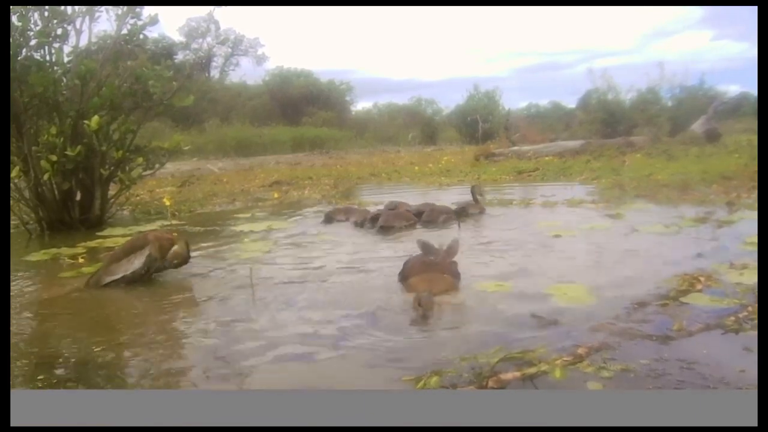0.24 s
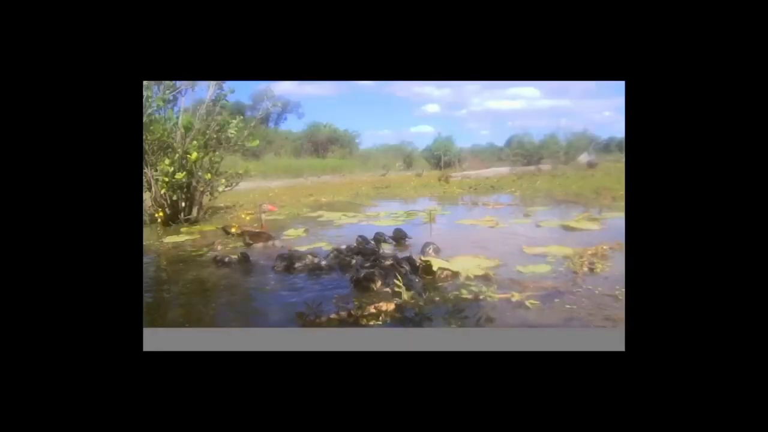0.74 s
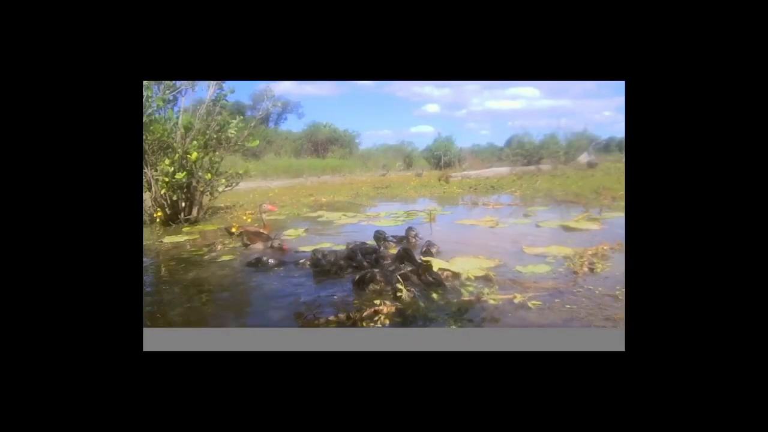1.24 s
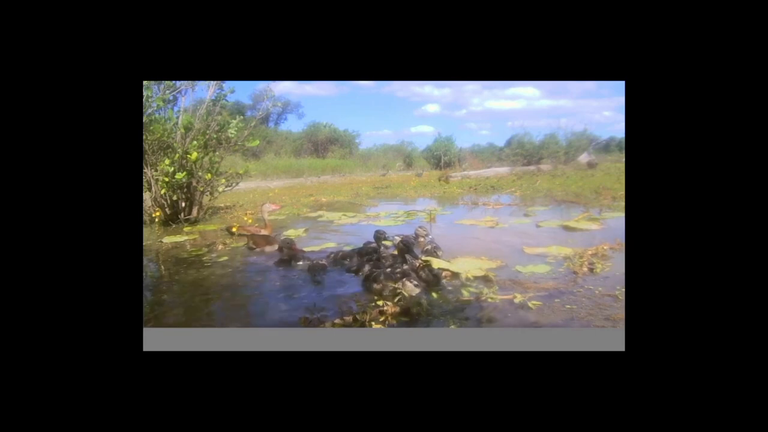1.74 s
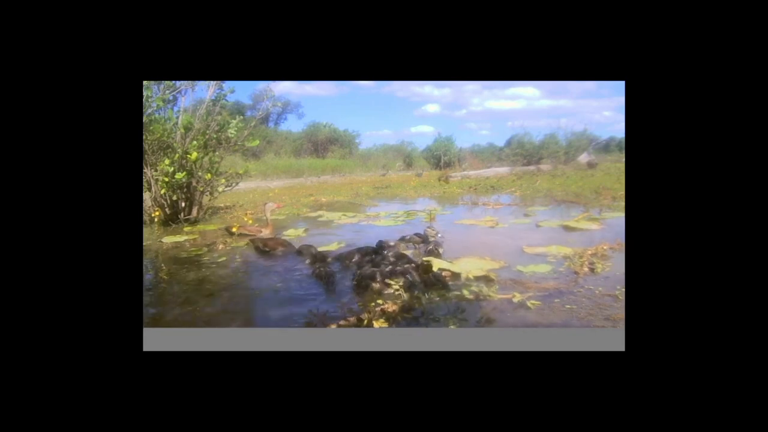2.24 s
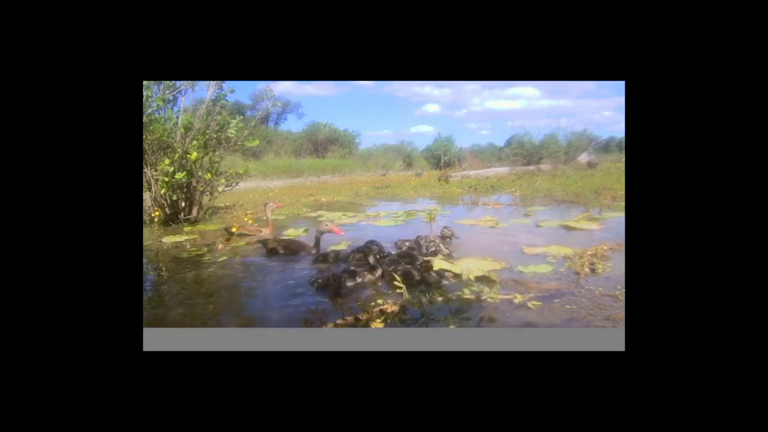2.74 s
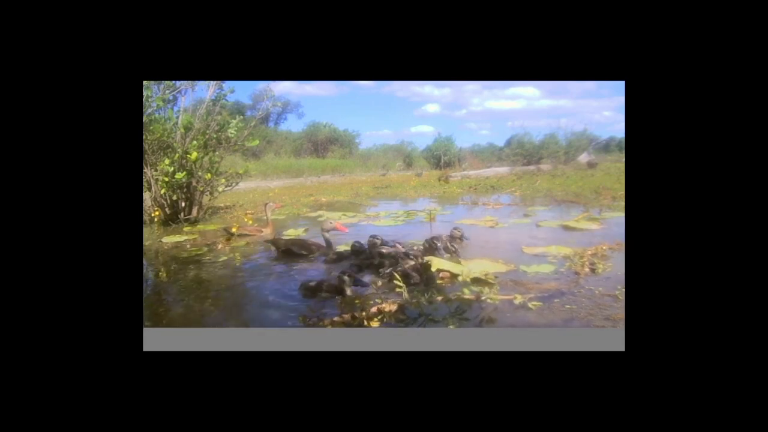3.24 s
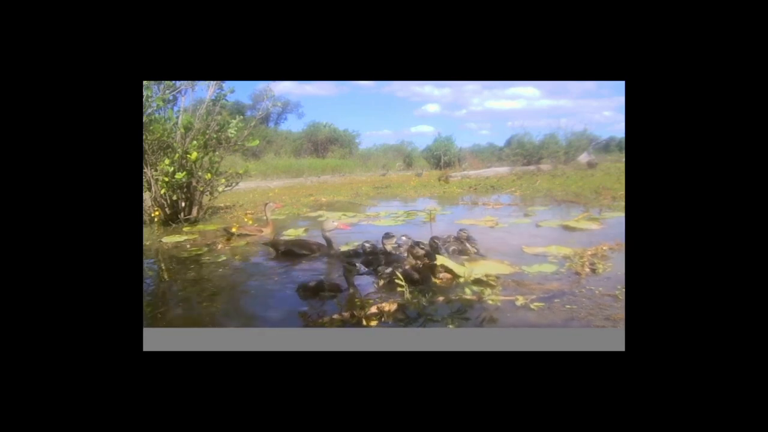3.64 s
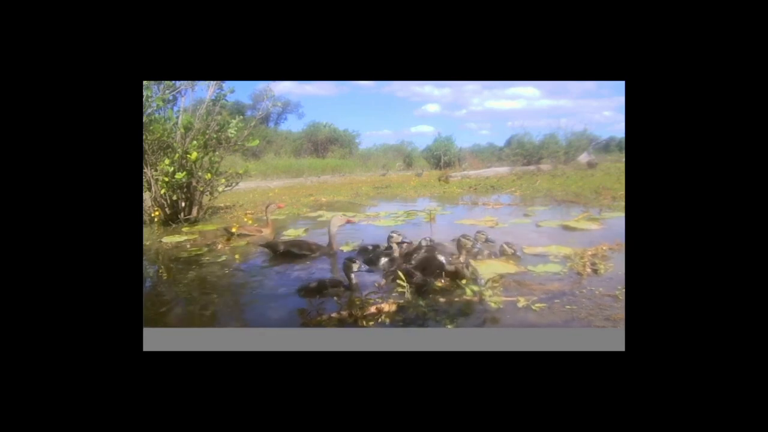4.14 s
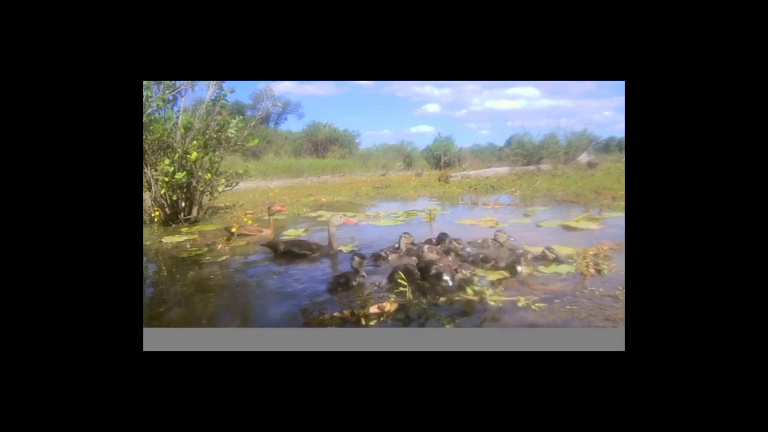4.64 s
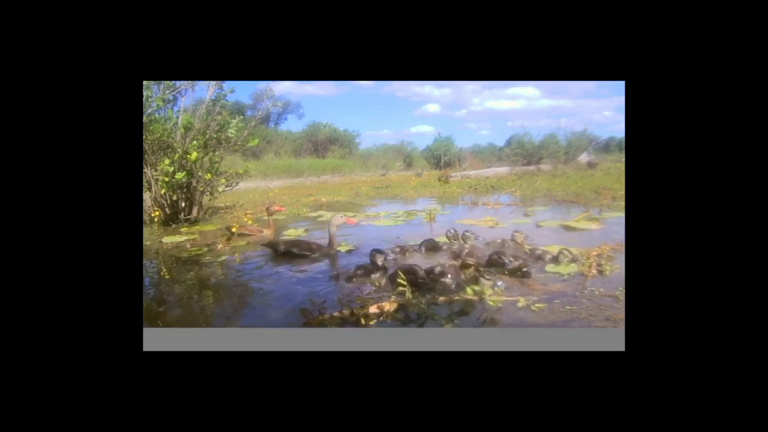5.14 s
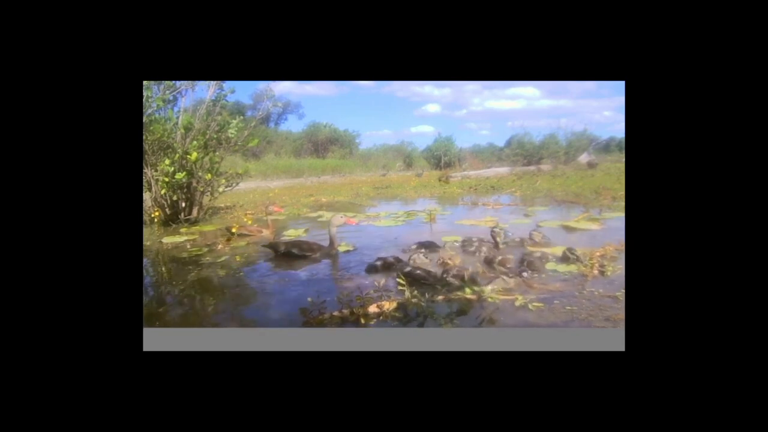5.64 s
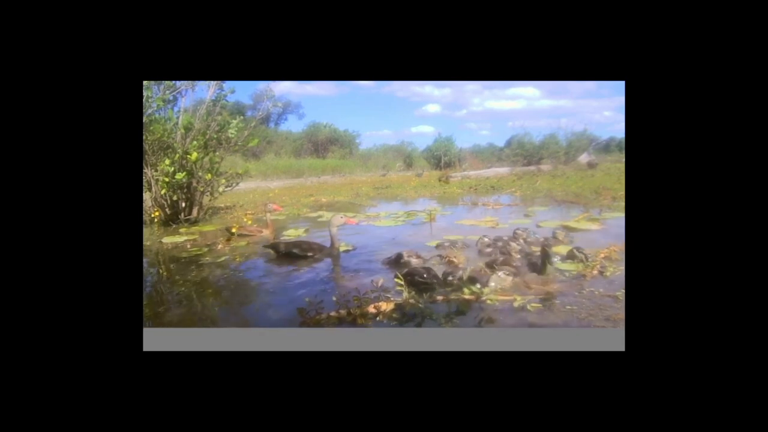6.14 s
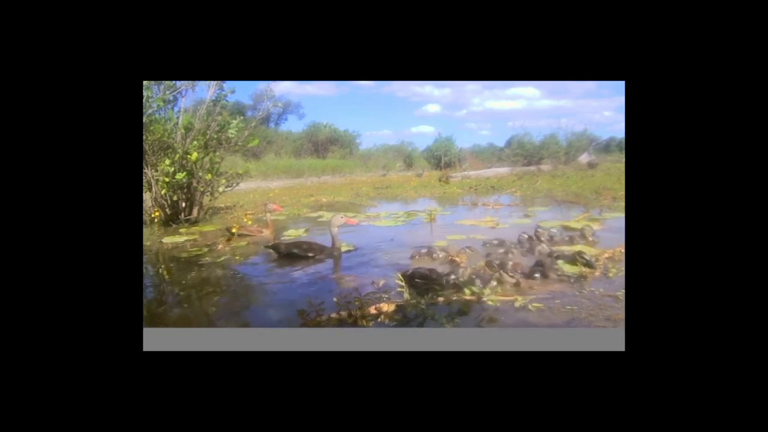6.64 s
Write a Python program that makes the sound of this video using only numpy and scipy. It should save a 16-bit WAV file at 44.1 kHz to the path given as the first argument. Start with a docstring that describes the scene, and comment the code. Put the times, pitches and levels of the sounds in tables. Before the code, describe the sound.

A brief wet pop and wind bump, then about half a second of dead silence. Sound snaps back with a duck flock feeding close by: crisp bill pops, droplets, tiny high peeps and nasal chatter. Piercing chirp-then-falling whistles recur about every second and a half. Low wind buffets strike the small, narrow-band outdoor microphone over faint leaf and water hiss.

```python
"""Whistling ducks in a shallow lagoon

Adults give two-voiced whistles from paired oscillators; others chatter in arched harmonic notes.
Ducklings peep in nearly pure pitch bends; bills dabble in cracks and ringing bubbles.
Filtered noise makes the wind rumble and the hiss of leaves and water.
A small field camera narrows the band and adds mirrored tones; faint treble lies above the band edge,
and the sound drops out once.
"""
import sys
import numpy as np
from scipy import signal
from scipy.io import wavfile
from scipy.ndimage import uniform_filter1d

SR = 44100
rng = np.random.default_rng(int(sys.argv[2]) if len(sys.argv) > 2 else 0)


def int16_out(signal):
    """Quantize to a 16-bit WAV file."""
    q = np.round(np.clip(np.atleast_2d(signal).T, -1, 1) * 32767)
    wavfile.write(sys.argv[1], SR, q.astype(np.int16))


N = 303849  # samples


def undb(db):
    """Amplitude for a level in dB."""
    return 10 ** (np.asarray(db) / 20)


def band(x, lo_hz, hi_hz, order=2):
    """Band-pass scaled to rms 1."""
    y = signal.sosfilt(signal.butter(order, [lo_hz, hi_hz], "band", fs=SR, output="sos"), x)
    return y / np.sqrt(np.mean(y ** 2))


def walk(rate, size):
    """Random levels, a new target every 1 / rate s, joined by slopes; spread near 1."""
    k = int(SR / rate)
    targets = np.repeat(rng.standard_normal(size // k + 1), k)
    return 1.2 * uniform_filter1d(targets, k)[:size]


def add(out, s, x):
    """Mix x into out from s seconds on."""
    i = int(s * SR)
    out[i:i + len(x)] += x[:len(out[i:])]


def swells(rows, column, base_db, order):
    """Gain that rests at a base level and rises in smooth humps at (middle s, half length s, ..) rows."""
    t = np.arange(N) / SR
    humps = sum(undb(r[column]) ** 2 * np.exp(-np.abs((t - r[0]) / r[1]) ** order) for r in rows)
    return np.sqrt(undb(base_db) ** 2 + humps)


# Calls of two adults, the fainter one farther off. Each row: top of the chirp in seconds, low voice there
# in Hz, chirp level in dB, start of the held note in seconds, its length in seconds, its highest low voice
# and highest high voice in Hz, its level in dB, lift of the octave in dB.
WHISTLE_CALLS = [(1.579, 3273, -21, 1.634, .207, 2700, 3445, -28.5, -1),
                 (2.946, 3280, -25, 3.007, .201, 2710, 3405, -32, 0),
                 (4.509, 3340, -22.5, 4.572, .199, 2724, 3463, -29.5, -1),
                 (5.896, 3260, -21, 5.954, .164, 2657, 3355, -31, 1),
                 (1.69, 2800, -56, 1.75, .26, 2290, 2950, -62, 12),
                 (5.712, 2830, -58, 5.775, .36, 2230, 2910, -61, 8),
                 (6.643, 2820, -57, 6.705, .3, 2330, 3040, -61, 9)]
# Partials made of both voices. Each row: times the low voice, times the high voice, dB over the high voice.
MIXED_PARTIALS = [(1, 1, -5), (-1, 2, -18), (0, 2, -15), (3, -1, -15), (2, -1, -34), (2, 1, -22),
                  (4, -1, -20), (-1, 3, -24)]
THIRD_DB = -8  # third partial of the low voice against its octave
BREATH_DB, RASP_DB = -24, 9  # rush of air that roughens the partials; extra while the chirp climbs
PARTIAL_WAVER_DB, CHIRP_FLUTTER_DB = 3, 3.5  # break-up of the overtones; quicker extra around the chirp


def whistles():
    """Two oscillators in one windpipe: each voice, the overtones of the low one, and their sums and differences."""
    out = np.zeros(N)
    for call in WHISTLE_CALLS:
        top_s = call[0]
        s, *columns = phrase(*call)
        t = np.arange(s[0], s[-1], 1 / SR)
        low_hz, low_db, octave_db, high_hz, high_db = (
            uniform_filter1d(np.interp(t, s, c), int(0.0042 * SR), mode="nearest") for c in columns)
        low = 2 * np.pi * np.cumsum(low_hz * (1 + 0.0035 * walk(150, size=len(t)))) / SR
        high = 2 * np.pi * np.cumsum(high_hz * (1 + 0.0029 * walk(150, size=len(t)))) / SR

        def waver():  # a fresh draw each time, so the partials swell apart
            slow = PARTIAL_WAVER_DB * walk(91, size=len(t))
            return slow + (t < top_s + .025) * CHIRP_FLUTTER_DB * walk(350, size=len(t))

        high_db = high_db + waver() / 2
        low_db = low_db + waver() / 3
        x = undb(low_db) * np.sin(low) + undb(high_db) * np.sin(high)
        octave_gain = undb(octave_db + waver())
        third = undb(THIRD_DB + waver()) * np.sin(3 * low)
        x += octave_gain * (np.cos(2 * low) - third)
        for m, n, db in MIXED_PARTIALS:
            x += undb(high_db + db + waver()) * np.sin(m * low + n * high + rng.uniform(0, 2 * np.pi))
        x *= 1 + undb(BREATH_DB + RASP_DB * (t < top_s)) * walk(1500, size=len(t))
        add(out, s[0], np.sqrt(2) * signal.windows.tukey(len(t), .06) * x)
    return out


# Shape of the quick chirp. Each row: seconds from its top, low voice in Hz before tuning, its level in dB,
# its octave in dB, high voice in Hz before tuning, its level in dB; levels against the chirp's own.
CHIRP_SHAPE = [(-.036, 2268, -29, -35, 3180, -66), (-.026, 2696, -21, -19.5, 3450, -35),
               (-.022, 2790, -18.5, -15.5, 3630, -8.5), (-.012, 3115, -13, -8.5, 4220, -5),
               (0, 3281, 1.5, -8, 4780, -7), (.012, 2845, -4.5, -11.5, 4700, -18),
               (.024, 2485, -14, -14, 4700, -45), (.036, 2274, -15, -11, 3165, -44)]
# Shape of the held note. Each row: share of its length, then columns as the chirp, against the note's level.
HELD_SHAPE = [(0, 2645, -14, -12, 3340, -3), (.25, 2700, -12, -11, 3420, 0),
              (.4, 2660, -14.5, -11, 3350, -4), (.55, 2555, -17.5, -16, 3125, -10),
              (.7, 2415, -18, -17, 2880, -12), (.86, 2170, -22, -25, 2720, -22),
              (1, 1880, -34, -40, 2600, -45)]
# The step just before the held note, one row: seconds from the note's start, then columns as the chirp.
JOIN_STEP = (-.011, 2540, -10, -11, 3290, -24)


def phrase(top_s, top_hz, chirp_db, held_s, length, low_hz, high_hz, held_db, octave_db):
    """A quick chirp and a held note, both sides of the syrinx sounding; placed, tuned and scaled for one whistle."""
    chirp, held = np.array(CHIRP_SHAPE), np.array(HELD_SHAPE)
    tune = top_hz / chirp[:, 1].max()
    chirp = chirp * [1, tune, 1, 1, tune, 1] + [top_s, 0, chirp_db, chirp_db + octave_db, 0, chirp_db]
    low_tune = low_hz / held[:, 1].max()
    high_tune = high_hz / held[:, 4].max()
    held = held * [length, low_tune, 1, 1, high_tune, 1]
    join = np.multiply(JOIN_STEP, [1, low_tune, 1, 1, high_tune, 1])
    held = np.vstack([join, held]) + [held_s, 0, held_db, held_db + octave_db, 0, held_db]
    return np.vstack([chirp, held]).T


# Soft arched notes. Each row: start in seconds, length in seconds, middle pitch in Hz, drop from there
# to the end as a share (0-1), level in dB, number of the loudest partial, change of the third partial in dB.
CHATTER_NOTES = [(0.704, 0.059, 1040, 0.09, -50.5, 4.6, 1), (0.757, 0.054, 1207, 0.1, -38.5, 2.47, 2.5),
                 (0.953, 0.062, 1084, 0.2, -52, 2.8, -9), (1.039, 0.054, 1187, 0.15, -35.5, 2.78, -1.5),
                 (1.195, 0.058, 1083, 0.27, -57.5, 2.6, 1.5), (1.343, 0.048, 1145, 0.16, -34, 3.37, 0),
                 (1.412, 0.07, 1165, .08, -56, 3, 0), (1.616, 0.049, 1156, 0.29, -36, 2.9, 0),
                 (1.956, 0.051, 1124, 0.25, -64.5, 2.7, 9.5), (2.083, 0.074, 1144, 0.26, -54.5, 3.1, -5),
                 (2.228, 0.075, 1155, 0.31, -55.5, 3.3, 2.5), (2.3, 0.063, 1130, 0.2, -56.5, 2.9, -7),
                 (2.504, 0.05, 1136, 0.23, -53, 2.4, -6), (2.536, 0.042, 1096, 0.3, -56, 2.9, 0),
                 (2.561, .04, 1190, 0.02, -59, 2.9, -6), (2.715, 0.064, 1110, 0.26, -59, 2.9, -12),
                 (2.764, 0.061, 1188, 0.08, -55.5, 2.8, -5), (2.817, 0.056, 1160, 0.3, -56.5, 2.8, 5),
                 (3.389, 0.077, 1126, .07, -57, 2.7, -5), (3.457, 0.042, 1170, 0.22, -52, 4.1, -2),
                 (3.619, 0.077, 1064, 0.33, -56.5, 3.6, -5), (3.788, 0.023, 1150, .08, -64, 4, 8),
                 (3.845, 0.048, 1115, 0.07, -58, 2.8, -7), (4.07, 0.06, 1100, 0.08, -58.5, 1.5, -13),
                 (4.265, 0.08, 1114, 0.1, -53.5, 3.2, -11), (3.576, 0.048, 1160, 0.1, -63, 4, -3),
                 (4.992, 0.036, 1140, 0, -65, 3.5, -8), (5.215, .03, 1110, 0.2, -62, 4, -2),
                 (6.25, 0.078, 1080, 0.34, -57, 3.4, 3), (6.456, 0.041, 1083, 0.25, -62.5, 4.2, 10)]
RISE_SHARE = 0.669  # a note climbs this share of what it falls
NASAL_DB = 4.5  # loss for each partial away from the loudest
MUFFLE_DB = -5  # times the square root of the steps outside partials 2 to 4
DULL_PER_DB, NEAR_DB = .25, -36  # upper partials fade this much for each dB a note lies below NEAR_DB
FAR_NOTES, FAR_DB = 20, -69  # murmur of birds across the water; its lowest note level


def chatter():
    """Nasal notes: seven partials that fall away from the loudest one; far birds add fainter ones at random."""
    out = np.zeros(N)
    far = [(u * N / SR, .04 + .03 * a, 1070 + 110 * b, .05 + .15 * c, FAR_DB + 5 * d, 2 + 2 * e, 16 * f - 11)
           for u, a, b, c, d, e, f in rng.random((FAR_NOTES, 7))]
    k = np.arange(1, 8)[:, None]  # partial numbers
    for s, length, hz, fall, db, loudest, third_db in CHATTER_NOTES + far:
        phase, swell = arch(length, hz * (1 - RISE_SHARE * fall), hz, hz * (1 - fall), edge=0.66)
        colour_db = third_db * (k == 3) + (k > 4) * DULL_PER_DB * (db - NEAR_DB)
        colour_db = colour_db + MUFFLE_DB * np.abs(k - np.clip(k, 2, 4)) ** .5
        gain = undb(db + colour_db - NASAL_DB * np.abs(k - loudest))
        add(out, s, swell * np.sum(gain * np.cos(k * phase), axis=0))
    return out


# Short pure notes: duckling peeps, and at 5.714 s the chirp of the far adult's whistle.
# Each row: start in seconds, length in seconds, start, middle and end pitch in Hz,
# level in dB, octave in dB over it.
SHORT_NOTES = [(0.643, 0.031, 5990, 4400, 4400, -50, -34), (0.774, 0.049, 3730, 3333, 2600, -41, -14.5),
               (0.791, 0.032, 4760, 3830, 3700, -42, -37), (0.889, 0.033, 3430, 3620, 2710, -37, -21),
               (0.901, 0.024, 5420, 4400, 4290, -50, -35), (1.008, 0.039, 3220, 3495, 2570, -37, -28),
               (1.028, 0.02, 5330, 4700, 4340, -51, -35), (1.078, 0.028, 4480, 3880, 3620, -41.5, -30),
               (1.154, 0.036, 5700, 4700, 3970, -48.5, -40), (1.293, 0.037, 5850, 4580, 4200, -47, -35),
               (1.443, 0.021, 4810, 4480, 4100, -41, -37), (3.686, 0.035, 2950, 3100, 2610, -46.5, -13),
               (3.712, 0.024, 3180, 3390, 2590, -46, -10), (3.782, 0.029, 3820, 3470, 2590, -50, -12),
               (3.83, 0.036, 2870, 3250, 2930, -51, -7), (3.85, 0.049, 3820, 3710, 2440, -49.5, -14),
               (3.938, 0.035, 3320, 4230, 2270, -48.5, -12.5), (4.035, 0.037, 4490, 3750, 2520, -50, -17),
               (4.121, 0.029, 2700, 2760, 2630, -63, 4), (4.142, 0.037, 3860, 3700, 2760, -48, -13.5),
               (4.212, 0.04, 2450, 2855, 2640, -63, 12.5), (4.206, 0.024, 3500, 4320, 5320, -51.5, -22),
               (4.242, 0.052, 3560, 4115, 2760, -35.5, -27), (4.35, 0.056, 3040, 4380, 3050, -36.5, -39),
               (4.426, 0.03, 4900, 3750, 3050, -47, -16), (4.562, 0.025, 5340, 4220, 3100, -34, -30),
               (4.913, 0.024, 3940, 3450, 3190, -52, -37), (5.055, 0.019, 3370, 3570, 2870, -51.5, -16),
               (5.436, 0.029, 4420, 4080, 3790, -56.5, -32), (5.544, 0.021, 4240, 4140, 3560, -52, -35),
               (5.66, 0.055, 4550, 4260, 3620, -57, -37), (5.674, 0.031, 2990, 3100, 2540, -50, -28),
               (5.714, 0.028, 2800, 2900, 2520, -48.5, -30)]


def peeps():
    """Nearly pure bends with an unsteady octave, mostly weak, that lives in the middle of the note."""
    out = np.zeros(N)
    for s, length, *hz, db, octave_db in SHORT_NOTES:
        phase, swell = arch(length, *hz, edge=.4)
        octave_gain = undb(octave_db + 4 * walk(250, size=len(phase))) * swell ** 2 / 2
        tone = np.sin(phase) + octave_gain * np.sin(2 * phase)
        add(out, s, undb(db + 2 * walk(300, size=len(phase))) * swell * tone)
    return out


def arch(length, start_hz, middle_hz, end_hz, edge):
    """Phase of a parabolic pitch bend through three points, and its swelling, flickering envelope."""
    u = np.linspace(0, 1, int(length * SR))
    hz = np.polyval(np.polyfit([0, .5, 1], [start_hz, middle_hz, end_hz], 2), u)
    swell = np.sqrt(2) * np.sin(np.pi * u) ** edge * undb(1.2 * walk(120, size=len(u)))
    return 2 * np.pi * np.cumsum(hz) / SR, swell


# Bills breaking the surface, the loudest. Each row: time in seconds, peak in dB, ring in Hz.
BILL_POPS = [(0.043, -31, 3550), (0.659, -24, 2770), (0.7064, -29, 1690), (0.7312, -27.5, 3550),
             (0.735, -24.5, 4630), (.872, -30.5, 990), (.9783, -33.5, 1670), (1.2396, -32, 1700),
             (1.2636, -25, 5840), (1.272, -35, 3650), (1.409, -29.5, 1410), (1.4451, -17.5, 4770),
             (1.4587, -27.5, 2510), (1.5066, -29, 3660), (1.5359, -29, 1550), (1.8708, -28.5, 5700),
             (1.892, -27, 2700), (2.1263, -29, 2740), (2.3275, -35.5, 2910), (2.4494, -39, 3400),
             (2.4847, -29.5, 1680), (3.2533, -32.5, 1486), (3.374, -34, 2780), (3.754, -35.5, 1190),
             (3.7673, -32, 1860), (4.0032, -25.5, 2880), (4.0129, -31, 1950), (4.1979, -24.5, 2660),
             (4.3394, -32, 2360), (4.3562, -20, 2480), (4.3583, -26, 3690), (4.4155, -27.5, 2800),
             (4.42, -27, 2140), (4.482, -19.5, 3440), (4.8228, -31, 2820), (4.8606, -22, 5500),
             (4.905, -27, 1880), (4.9103, -21, 2260), (5.1039, -30.5, 1480), (5.2441, -28.5, 3730),
             (5.331, -23, 2600), (5.3541, -27.5, 2320), (5.4565, -33, 2380), (5.522, -31.5, 2300),
             (5.6429, -32.5, 6500), (5.7654, -23, 2860), (5.78, -31, 4450), (5.8572, -23, 2740),
             (6.1333, -30.5, 2200), (6.17, -29, 3750), (6.22, -23, 2560), (6.262, -23, 4000),
             (6.3114, -27.5, 3000), (6.4354, -26.5, 2760), (6.5068, -31.5, 1300), (6.594, -36.5, 6000),
             (6.6477, -33.5, 5870), (6.739, -43, 4500), (6.791, -32, 4300), (6.833, -28, 4360),
             (6.852, -35, 5420)]
# Bouts in which the whole flock feeds. Each row: middle in seconds, half length in seconds, level in dB.
FEEDING_BOUTS = [(1.1, 0.5, -53), (4.6, 0.24, -54.5), (5.9, 0.87, -56.5)]
IDLE_DB = -67.5  # dabbling between the bouts
LONE_POPS, LONE_DB = 50, -45  # faint pops at random moments; the lowest peak


def dabbling():
    """Loud pops, each trailed by droplets, over random little splashes whose level follows the flock."""
    out = np.zeros(N)
    for (s, db, hz), c in zip(BILL_POPS, rng.random((len(BILL_POPS), 10))):
        add(out, s - .0004, undb(db) * pop(hz, cycles=0.75 + 0.95 * c[0], crack=0.22 + 0.56 * c[1]))
        for lag, tone in c[2:].reshape(4, 2):
            droplet = pop(900 * 8.2 ** tone, cycles=6.3, crack=0.4)
            add(out, s + .016 * lag, undb(db - 10.5 - 26.5 * lag) * droplet)
    for u, size, tone, ring in rng.random((LONE_POPS, 4)):
        lone = pop(1200 * 5 ** tone, cycles=1.5 + 5.2 * ring, crack=0.05)
        add(out, u * N / SR, undb(LONE_DB + 6.6 * size) * lone)
    patter = np.zeros(N)
    for u, size, *drops in rng.random((520, 14)):
        # a splash: four drops within 22 ms, the later ones softer
        for lag, tone, ring in np.reshape(drops, (4, 3)):
            drop = pop(950 * 5.5 ** (tone ** 1.1), cycles=.8 + 2.5 * ring, crack=.25)
            add(patter, u * N / SR + .022 * lag, undb(-2.8 * np.log(size) - 6 * lag) * drop)
    return out + patter / patter.std() * swells(FEEDING_BOUTS, column=2, base_db=IDLE_DB, order=4)


def pop(hz, cycles, crack):
    """A broad crack and a short bubble ring that glides up; peak 1."""
    turns = hz * np.arange(int(0.019 * SR)) / SR
    ring = np.exp(-turns / cycles) * np.sin(2 * np.pi * turns * (1 + 0.019 * turns))
    crack_decay = np.exp(-np.arange(len(ring)) / (0.00074 * SR))
    ring += crack * hz / 3000 * crack_decay * rng.standard_normal(len(ring))
    return ring / np.abs(ring).max()


# Gusts on the microphone. Each row: middle in seconds, half length in seconds, slow rumble in dB,
# quick flutter in dB before its lumps.
WIND_GUSTS = [(1.91, .022, -25, -38.5), (2.4, 0.12, -34.5, -48), (4.2, 0.38, -34.5, -70),
              (5.55, 0.21, -26.5, -54.5), (6.05, .05, -26, -53), (6.4, 0.059, -23, -43.5),
              (6.82, 0.14, -24, -36.5)]
CALM_RUMBLE_DB, CALM_FLUTTER_DB = -40.5, -60
# Single pushes that tip over into a pull: first a thump at 0.166 s just before the sound drops out, then wind
# buffets. Each row: tip in seconds, level in dB, time scale in seconds.
WIND_BUFFETS = [(0.166, -21, 0.032), (1.93, -21, 0.021), (2.033, -29, 0.012), (4.276, -28.5, 0.023),
                (5.236, -25, 0.023), (5.561, -20.5, 0.02), (5.963, -17.5, 0.018), (6.674, -16.5, 0.025)]


def wind():
    """Slow pressure swings, a quicker lumpy flutter in the gusts, and single buffets."""
    rumble = band(band(rng.standard_normal(N), 4.86, 16.6), 2.83, 40., order=1)
    flutter = band(band(rng.standard_normal(N), 19.0, 83.4), 23.0, 260.0, order=1)
    flutter = flutter * undb(3.05 * walk(13, size=N))  # lumps
    out = swells(WIND_GUSTS, column=2, base_db=CALM_RUMBLE_DB, order=2) * rumble
    out += swells(WIND_GUSTS, column=3, base_db=CALM_FLUTTER_DB, order=2) * flutter
    for s, db, length in WIND_BUFFETS:
        u = (np.arange(N) / SR - s) / length
        out -= undb(db) * np.tanh(3.8 * u) * np.exp(-(u / 1.62) ** 2)
    return out


# Colour of the hiss. Each row: frequency in Hz, relative density in dB per Hz.
AIR_COLOUR = [(88, -31), (150, 2), (705, -4), (1450, -9), (2250, -4.5), (2530, -13), (3210, -0.5),
              (3730, -13), (4420, -7.5), (6840, -26), (8370, -33.5), (10900, -63), (18400, -120)]
AIR_DB = -59  # overall rms


def air():
    """Distant hiss of leaves and water; half-octave bands of noise flicker a little on their own."""
    out, (hz, db) = 0, np.transpose(AIR_COLOUR)
    for f in 160 * 2 ** np.arange(0, 6, .5):
        density_db = np.interp(np.log(f), np.log(hz), db)
        gain_db = density_db + 10 * np.log10(f) + 1.22 * walk(14, size=N)  # wider bands hold more power
        out = out + undb(gain_db) * band(rng.standard_normal(N), f / 2 ** .25, f * 2 ** .25)
    return out / out.std() * undb(AIR_DB)


# Echoes off the water and the near bank. Each row: delay in seconds, level in dB.
BANK_ECHOES = [(0.0096, -14.5), (.024, -25)]
SHORE_DB, SHORE_T60_S = -19, .26  # scattered tail from the bushes


def shore(flock):
    """The flock with a decaying noise tail and discrete echoes."""
    t = np.arange(int(.4 * SR)) / SR
    tail = rng.standard_normal(len(t)) * np.exp(-np.log(1000) * t / SHORE_T60_S) * (t > .03)
    heard = flock + undb(SHORE_DB) * signal.fftconvolve(flock, tail / np.linalg.norm(tail))[:N]
    for s, db in BANK_ECHOES:
        add(heard, s, undb(db) * flock)
    return heard


def scene():
    """The flock with its shore echoes, the wind and the air, on one channel."""
    flock = whistles() + chatter() + peeps() + dabbling()
    return (shore(flock) + wind() + air())[None]


# The silent gap, one row: start in seconds, end in seconds.
DROPOUT_GAP = (0.175, .6402)
MIC_HZ, TOP_HZ = 8050, 15500  # edge of the narrow band; upper limit of the added treble
SAMPLING_HZ, MIRROR_DB = 16000, -5  # tones folded about half the sampling rate; their level
TREBLE_DB = -25  # faint added treble above the band edge, gain before its high-pass
OFFSET = .0062  # constant shift, full scale 1


def record(dry):
    """A narrow band, tones mirrored at its edge, faint added treble above it, an offset and a silent gap."""
    t = np.arange(N) / SR
    soft = signal.sosfilt(signal.butter(4, 8600, fs=SR, output="sos"), dry)
    mirror = 2 * np.cos(2 * np.pi * SAMPLING_HZ * t) * soft
    mic_filter = signal.cheby1(11, .3, MIC_HZ, fs=SR, output="sos")
    narrow = signal.sosfilt(mic_filter, soft + undb(MIRROR_DB) * mirror)
    treble = signal.sosfilt(signal.butter(4, 2000, "high", fs=SR, output="sos"), narrow)
    # faint added treble above the band edge
    above = undb(TREBLE_DB) * np.abs(treble)
    above = signal.sosfilt(signal.butter(8, 8800, "high", fs=SR, output="sos"), above)
    wide = signal.sosfilt(signal.ellip(8, .2, 70, TOP_HZ, fs=SR, output="sos"), narrow + above)
    live = (t < DROPOUT_GAP[0]) | (t > DROPOUT_GAP[1])
    return (wide + OFFSET) * live


dry = scene()
out = record(dry)
int16_out(out)
```